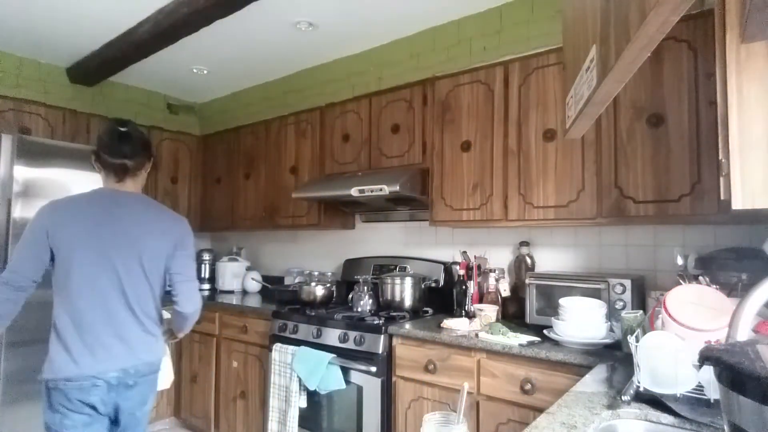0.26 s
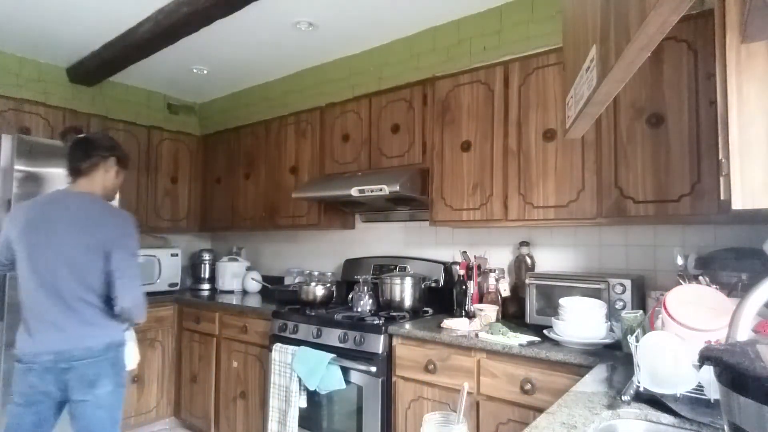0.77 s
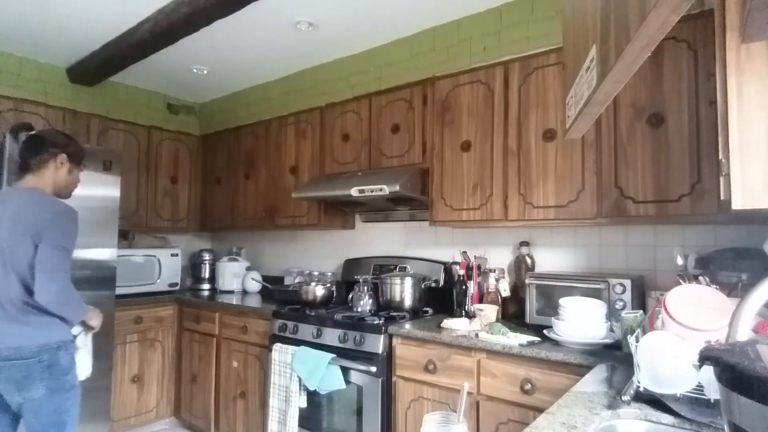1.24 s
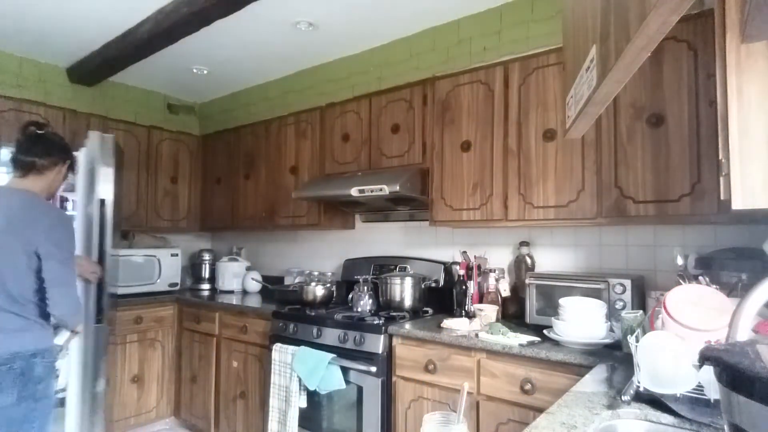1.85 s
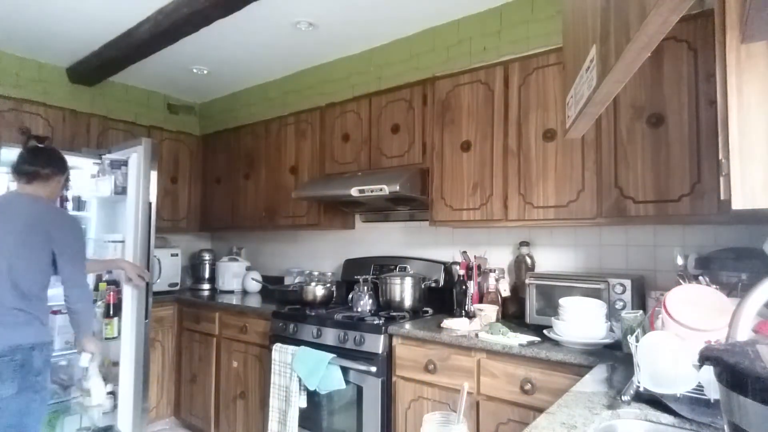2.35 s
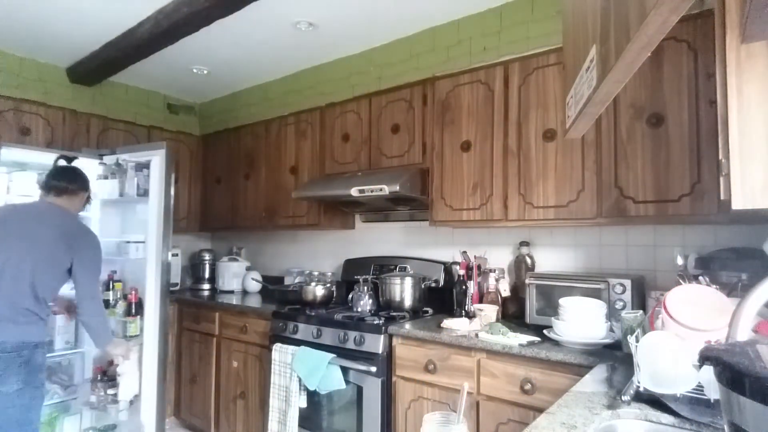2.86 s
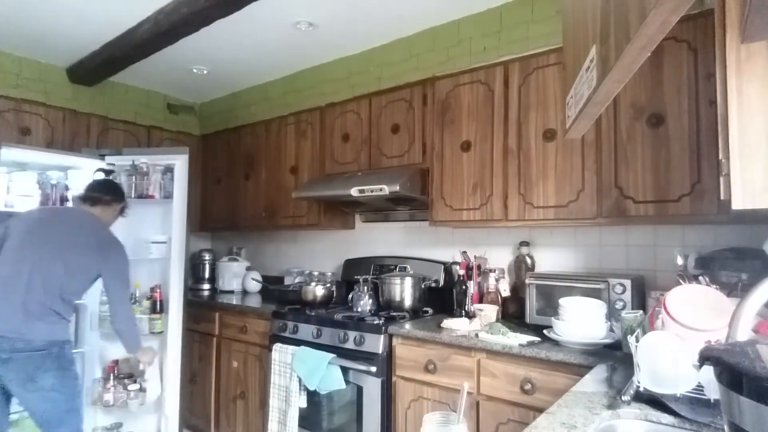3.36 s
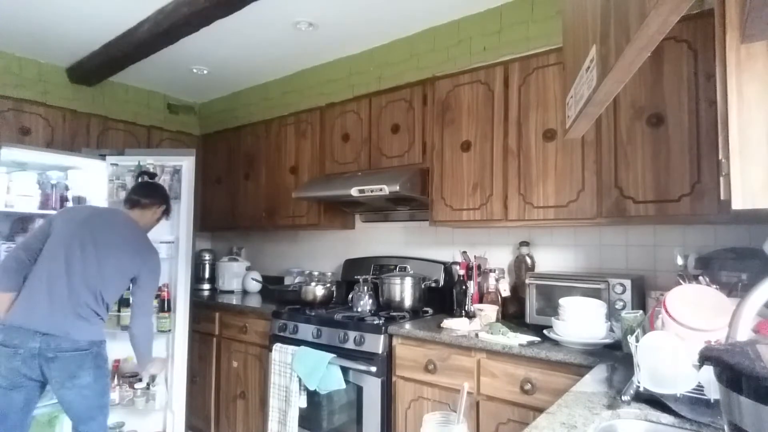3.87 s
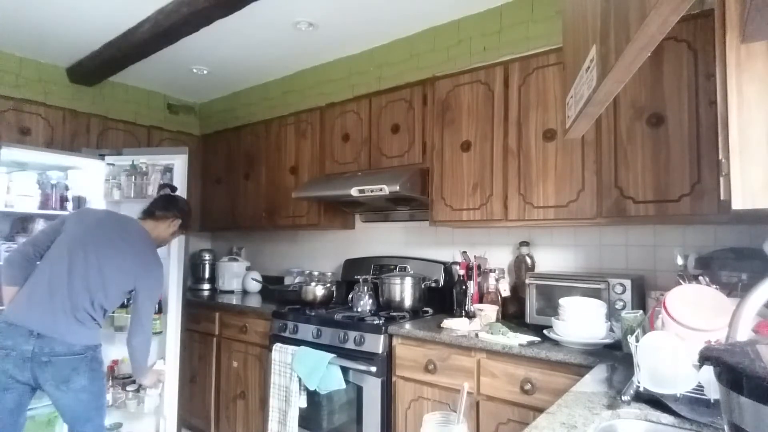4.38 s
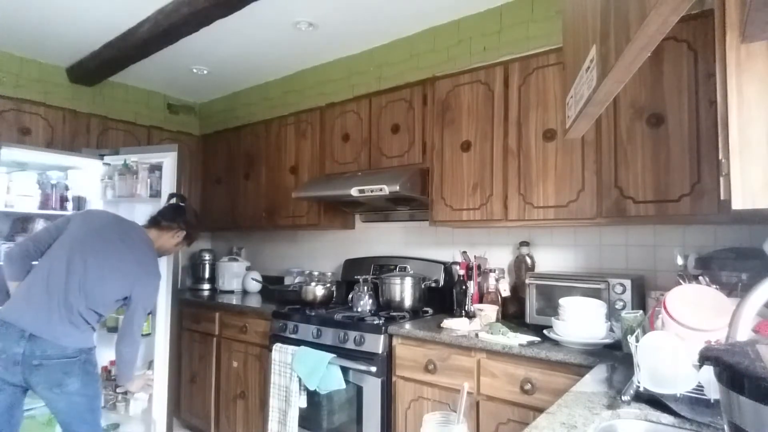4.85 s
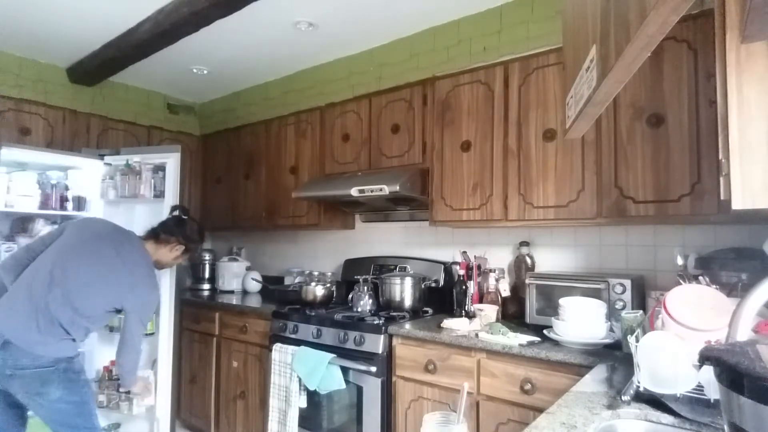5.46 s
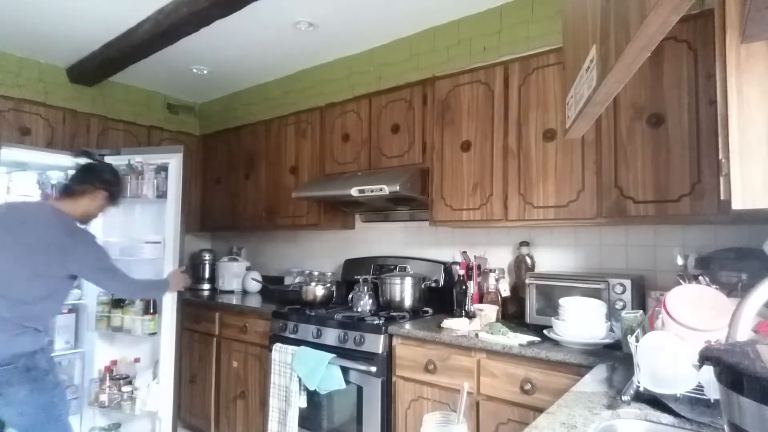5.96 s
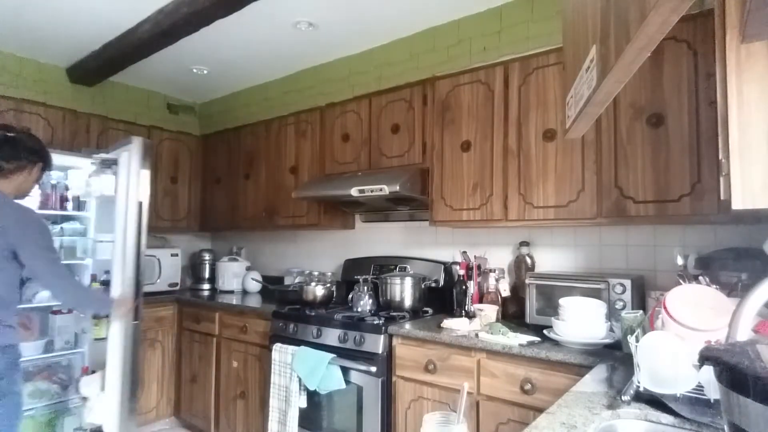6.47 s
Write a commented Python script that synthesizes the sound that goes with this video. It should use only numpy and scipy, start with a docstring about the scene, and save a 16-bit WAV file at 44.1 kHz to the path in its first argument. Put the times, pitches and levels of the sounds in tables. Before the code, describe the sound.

A far microphone in a quiet kitchen picks up soft footsteps and clothing, a swelling fridge hum and a quick run of dull door thuds. The hum stops; a hollow tub bumps, bottles clink and jars clatter sharply on plastic shelving. Sparse small knocks and rubs come next, then a second strong clatter, and lastly a low airy door swing with faintly rattling jars.

```python
"""A refrigerator across a home kitchen: its hum swells, the door is tugged open and the fan winds down.
Tugs and set-down jars knock the plastic door shelves: noise shaped by the door, panel modes, a note per container.
Bottles clink, a tub bumps, containers scrape and jostle; last, filtered noise follows the door swinging shut.
The microphone is far off, so knocks come mostly as room sound; clothes and still air are shaped noise."""
import sys
import numpy as np
from scipy import signal
from scipy.fft import rfft, irfft, next_fast_len
from scipy.io import wavfile
from scipy.ndimage import uniform_filter1d

SR = 44100
rng = np.random.default_rng(int(sys.argv[2]) if len(sys.argv) > 2 else 0)


def to_wav(sig):
    """Store sig (one row per channel, or 1-D mono) as 16-bit WAV at the path in sys.argv[1].

    Samples outside -1..1 are clipped; the rate is SR.
    """
    pcm = np.clip(np.atleast_2d(sig), -1, 1) * 32767
    pcm = np.round(pcm).astype(np.int16)
    wavfile.write(sys.argv[1], SR, pcm.T)  # frames by channels


N = 296087
TIME = np.arange(N) / SR
RING = np.arange(32768) / SR  # time axis of one event [s]


def amp(db):
    """Decibels to amplitude."""
    return 10 ** (np.asarray(db) / 20)


def evened(x):
    """Scales to rms 1."""
    return x / np.sqrt(np.mean(x ** 2) + 1e-20)


def read(points, hz):
    """Reads the first two columns of a table on a log-frequency axis."""
    f, value = np.transpose(points)
    return np.interp(np.log(hz + 1), np.log(np.abs(f) + 1), value)


def bins(x):
    """Frequencies of the spectrum of x [Hz]."""
    return np.fft.rfftfreq(len(x), 1 / SR)


def coloured(x, spectrum):
    """Gives x a spectrum and rms 1."""
    return evened(np.fft.irfft(rfft(x) * amp(read(spectrum, bins(x))), len(x)))


def burst():
    """White noise as long as one event."""
    return rng.standard_normal(len(RING))


def noise(spectrum):
    """Steady shaped noise for the whole scene."""
    return coloured(rng.standard_normal(next_fast_len(N)), spectrum)[:N]


def add(mix, start_s, sound):
    """Adds an event to the mix in place."""
    part = mix[max(round(start_s * SR), 0):][:len(sound)]
    part += sound[:len(part)]


def swell(rise_s):
    """Reflections pile up over the first milliseconds."""
    return 1 - np.exp(-RING / rise_s)


def held(on_s, off_s, rise_s, fall_db_per_s):
    """Gain that rises from on_s and fades from off_s."""
    rising = 1 - np.exp(-np.maximum(TIME - on_s, 0) / rise_s)
    return rising * amp(-fall_db_per_s * np.maximum(TIME - off_s, 0))


# kitchen reverberation: (frequency [Hz], t60 [s])
ROOM = [(60, 1), (150, 0.3), (400, 0.48), (1500, 0.47), (4000, 0.41), (8000, 0.4), (15000, 0.65)]


def dying(x):
    """Each band of a burst dies away at the pace of the kitchen."""
    hz, t, z = signal.stft(x, SR, nperseg=512)
    decay = amp(-60 * t / read(ROOM, hz)[:, None])
    return signal.istft(z * decay, SR, nperseg=512)[1][:len(x)]


def stroke(length_s, rise_s, sag_db_per_s=10):
    """Swells, eases off while the rubbing lasts, then dies in the room."""
    sag_db = sag_db_per_s * (length_s / 2 - np.minimum(RING, length_s))
    room_db = -60 * np.maximum(RING - length_s, 0) / read(ROOM, 1500)
    return swell(rise_s) * amp(sag_db + room_db)


def ring(modes, blur, shade=None):
    """Decaying modes; echoes blur each one with a slowly wandering part."""
    out, knots = np.zeros(len(RING)), RING[::700]
    for hz, db, t60_s in modes:
        phase = rng.random()
        wander = rng.standard_normal(len(knots))
        shade_db = read(shade, hz) if shade else 0
        size = amp(db + shade_db - 60 * knots / t60_s) * (1 + blur * wander)
        wave = np.sin((2 * np.pi * (hz * RING + phase)).astype(np.float32))
        out += np.interp(RING, knots, size) * wave
    return out * np.sqrt(2)


# blows on door and shelves: (time [s], level [dB], thump [dB], contact hardness [dB],
#   note of the jar, lid or panel hit [Hz], note against blow [dB])
KNOCKS = [(1.069, -62.5, 19.5, -15.5, 315, 1), (1.143, -48, 10, -12, 288, -12.5),
          (1.168, -44.5, 8.5, -7, 73.2, 3.5), (1.211, -39.5, 12.5, -0.5, 309.3, 6),
          (1.234, -34.5, 1, -6, 380, -6.5), (1.3, -37, 5.5, -11.5, 49.4, -8),
          (1.345, -46.5, 8, -7, 267, -13), (1.445, -52, -5, 1, 312, -1), (1.797, -68, 15.5, -2, 1580, -8),
          (2.375, -49.5, 2, -1.5, 279, -1), (2.394, -51, 12.5, 11, 240.3, 3),
          (2.631, -43.5, -5, 5.5, 550, -12), (2.675, -43, -1, 10.5, 1690, -7),
          (2.715, -47.5, 4, 11, 291, -1.5), (2.78, -45.5, 3.5, 10, 222, -4),
          (2.826, -48, -16, 8, 1660, -16), (3.408, -30.5, -14, 2.5, 587.4, -5),
          (3.438, -33.5, 2.5, 2, 947, -6.5), (3.49, -45.5, 14, -15, 578, 1.5),
          (3.547, -41, 4, 11.5, 462, 0), (3.593, -41.5, -10, 9, 2450, -9), (3.616, -24, -3.5, 8.5, 575, -3),
          (3.631, -19.5, -6, -2.5, 357, -10.5), (3.642, -30.5, -6, -3, 446.5, 1),
          (3.781, -39, 1.5, 11.5, 556, -0.5), (4.132, -63, -4, -1, 1785, 1), (4.441, -48, 1, 4, 650, -15),
          (4.481, -39.5, 1, -2, 718, -10), (4.508, -42.5, 6.5, -1, 124, -1),
          (4.645, -44.5, 3.5, 1, 261, -11), (4.708, -46, 11.5, 1, 273.6, 1.5),
          (5.456, -50.5, 5, -4, 240, -10), (5.483, -41, 3.5, -2, 563, -5.5),
          (5.51, -40.5, 2.5, -4.5, 353.6, -5.5), (5.638, -40, -5, 5, 2410, -9),
          (5.688, -29, 1.5, 4.5, 277.4, -4), (5.696, -24, -4, 0.5, 350.7, -5.5),
          (6.002, -55.5, 9, 8, 329, 7), (6.276, -58, 4, 1, 205, 2)]
# hollow tub bumping along a shelf: (time [s], level [dB])
BUMPS = [(2.785, -43), (2.921, -37), (2.99, -36.5), (3.208, -40), (3.263, -38.5)]
BUMP_DB, BUMP_THUMP_DB, BUMP_HARD_DB = -5, 2.5, -4  # shelf knock per bump; BUMP_DB is against the bump
RISE_S, RISE_DB_PER_HARD_DB = 0.0039, -0.5  # build-up at hardness 0; harder is faster
ROCK_DELAY_S, ROCK_DB, ROCK_RISE_S = 0.088, -19.5, 0.022  # ROCK_DB is against the blow


def blows():
    """Rows (s, dB, thump dB, hardness dB, rise s): knocks, tub bumps, one rock back before each pause."""
    first = [row[:4] for row in KNOCKS]
    first += [(s, db + BUMP_DB, BUMP_THUMP_DB, BUMP_HARD_DB) for s, db in BUMPS]
    pauses = np.diff([row[0] for row in KNOCKS], append=TIME[-1])
    rocking = [(s + ROCK_DELAY_S, db + ROCK_DB, thump, hard, ROCK_RISE_S)
               for (s, db, thump, hard), pause in zip(first, pauses) if pause > ROCK_DELAY_S]
    struck_once = [(s, db, thump, hard, RISE_S * amp(RISE_DB_PER_HARD_DB * hard))
                   for s, db, thump, hard in first]
    return struck_once + rocking


# loaded door when struck: (frequency [Hz], density [dB per Hz])
DOOR = [(18, -34), (35, -9), (80, -7.5), (240, 0.5), (350, -0.5), (570, -1.5), (720, -2.5), (1000, -6.5),
        (2300, -15.5), (2850, -22), (4500, -29), (6700, -40.5), (8200, -54.5), (15000, -59)]
# ringing panels and bins: (frequency [Hz], level [dB], t60 [s])
DOOR_MODES = [(79.43, -16.5, 0.75), (114, -14, 0.45), (159, -17, 0.6), (225.4, -14.5, 0.41),
              (280.1, -13.5, 0.51), (357, -20, 0.14), (476, -28.5, 0.22), (497, -17, .4),
              (577, -13.5, 0.36), (632, -13.5, 0.41), (763, -21.5, 0.62), (823, -18, 0.13),
              (849, -30, 0.26), (979, -14, 0.13), (1104, -25.5, 0.67), (1364, -15.5, 0.27),
              (1652, -21, 0.45), (2130, -30.5, 0.21), (2493, -25.5, 0.28)]
# clatter and tick: (frequency [Hz], level at hardness 0 [dB], slope [dB per dB of hardness])
HARD_SHADE = [(615, -0.5, 0), (2000, 1, 0.78), (5000, 1, 1.18), (8000, -2.5, 1.21), (12000, -1, 0)]
THUMP_HZ = 218


def knocks(dense_db=-2.5, modes_db=-3.0, early_db=2, early_s=0.0015, grain=0.1, blur=0.21):
    """Every blow rings the door: a thicket of shelf resonances and echoes, a few panel modes standing out."""
    out, hz = np.zeros(N), bins(RING)
    body = evened(amp(read(DOOR, hz)))
    for s, db, thump_db, hard_db, rise_s in blows():
        shade = [(THUMP_HZ, thump_db)]
        shade += [(f, level + slope * hard_db) for f, level, slope in HARD_SHADE]
        # first reflections arrive as uneven clicks, later ones merge smoothly
        steps = np.repeat(rng.standard_normal(512), len(RING) // 512)
        uneven = np.exp(grain * np.exp(-RING / 0.016) * steps)
        dense = dying(irfft(rfft(burst() * uneven) * body * amp(read(shade, hz))))
        blow = amp(dense_db) * dense + amp(modes_db) * ring(DOOR_MODES, blur, shade)
        add(out, s, amp(db + early_db * np.exp(-RING / early_s)) * swell(rise_s) * blow)
    return out


NOTE_T60_S, NOTE_REF_HZ, NOTE_DAMPING = 0.27, 400, 0.28  # t60 at NOTE_REF_HZ; power by which it falls with pitch
OVERTONE_RATIO, OVERTONE_DB = 1.8, -13  # against the note


def containers(rise_s=0.003, blur=0.1):
    """Each knock adds a note of its own and one overtone; higher partials die sooner."""
    out = np.zeros(N)
    for s, db, _, _, hz, note_db in KNOCKS:
        level_db = db + note_db
        partials = [(hz, level_db), (hz * OVERTONE_RATIO, level_db + OVERTONE_DB)]
        modes = [(f, level, NOTE_T60_S * (NOTE_REF_HZ / f) ** NOTE_DAMPING) for f, level in partials]
        add(out, s, swell(rise_s) * ring(modes, blur))
    return out


def struck(hits, modes, rise_s, blur):
    """One object ringing with the same modes at each hit."""
    out = np.zeros(N)
    for s, db in hits:
        add(out, s, amp(db) * swell(rise_s) * ring(modes, blur))
    return out


# glass bottles touching: (time [s], level [dB])
CLINKS = [(3.41, -42.5), (3.449, -32), (3.516, -40)]
# glass modes: (frequency [Hz], level [dB], t60 [s])
GLASS = [(3140, -3, 0.16), (3040, -25, 0.27), (2960, -7, 0.31), (3500, -18.5, 0.23), (3550, -14, 0.16),
         (3410, -16, 0.24), (6260, -33, 0.51), (1633, -8.5, 0.1), (1324, -9, 0.19)]


def clinks():
    """Touching bottles ring in high glass modes."""
    return struck(CLINKS, GLASS, rise_s=0.006, blur=0.22)


# tub modes: (frequency [Hz], level [dB], t60 [s])
TUB = [(483.4, 3, 0.15), (522, -3.5, 0.2), (375, -3.5, 0.11), (789, -7, 0.21), (1040, -23, 0.21)]


def tub():
    """A hollow tub rings in short low modes at each bump."""
    return struck(BUMPS, TUB, rise_s=0.019, blur=0.37)


# snaps of hard plastic: (time [s], level [dB])
SNAPS = [(3.409, -57), (3.55, -52), (3.617, -54), (3.78, -65), (5.485, -63), (5.531, -65), (5.643, -64.5),
         (5.696, -61.5), (6.002, -81.5)]
# snap spectrum: (frequency [Hz], density [dB per Hz])
SNAP = [(2500, -25), (4300, 5), (7000, 0.5), (8500, -9), (10500, -3), (12500, -1.5), (16000, -9)]


def snaps(early_db=2.5, early_s=0.012, rise_s=0.0005):
    """Plastic edges click: a sharp front and a bright room tail."""
    out = np.zeros(N)
    for s, db in SNAPS:
        tail = dying(coloured(burst(), SNAP))
        add(out, s, amp(db + early_db * np.exp(-RING / early_s)) * swell(rise_s) * tail)
    return out


# seal peeling off, containers dragged along plastic: (start [s], length [s], level [dB])
SCRAPES = [(1.34, 0.17, -63), (2.435, 0.068, -53), (2.657, 0.31, -52.5), (3.07, 0.3, -58.5),
           (3.418, 0.34, -42), (4.015, 0.18, -76), (4.469, 0.33, -53.5), (5.307, 0.19, -73.5),
           (5.488, 0.32, -54), (6.103, 0.024, -57.5)]
# rubbing spectrum: (frequency [Hz], density [dB per Hz])
RUB = [(100, -8), (500, 2), (1200, -3.5), (2300, -9), (3000, -12), (6500, -23), (8200, -42.5),
       (15000, -27.5)]
# squeak of the peeling rubber seal: (start [s], length [s], centre [Hz], width [Hz], level [dB])
SQUEAK = (1.228, .04, 5170, 200, -71.5)


def friction(slips_per_s=45, slip_db=2, slip_decay_s=0.03, modes_db=-4):
    """Containers stick and slip on the shelves and stir the door's panels; the seal squeaks once, thinly."""
    out, hz = np.zeros(N), bins(RING)
    panels = 1 + amp(modes_db) * sum(4 / (1 + ((hz - mode[0]) / 9) ** 2) for mode in DOOR_MODES)
    r = np.exp(-1 / (slip_decay_s * SR))
    for s, length_s, db in SCRAPES:
        slips = signal.lfilter([1], [1, -r], rng.random(len(RING)) < slips_per_s / SR)
        rubbing = irfft(rfft((1 + amp(slip_db) * slips) * burst()) * panels)
        add(out, s, amp(db) * stroke(length_s, rise_s=0.0038) * coloured(rubbing, RUB))
    s, length_s, centre_hz, width_hz, db = SQUEAK
    resonance = 1 / (1 + (2 * (hz - centre_hz) / width_hz) ** 2)
    squeak = evened(irfft(rfft(burst()) * resonance))
    add(out, s, amp(db) * stroke(length_s, rise_s=0.0032) * squeak)
    return out


# neighbouring containers jostled by the hand: (start [s], length [s], level [dB])
JOSTLES = [(1.8, 0.11, -84), (2.64, 0.17, -53.5), (3.238, 0.074, -56), (3.93, .24, -60),
           (4.229, 0.2, -67.5), (4.819, .25, -70.5)]
# jostle spectrum: (frequency [Hz], density [dB per Hz])
JOSTLE = [(300, -14.5), (750, -7.5), (1150, 1.5), (1500, -2.5), (2150, -1.5), (2800, -13), (5000, -22),
          (8000, -45.5), (15000, -52)]


def jostles(count=3, rise_s=0.0019):
    """Light touches, one at a chance moment in each equal part of a jostle."""
    out = np.zeros(N)
    for start_s, length_s, db in JOSTLES:
        for k, when in enumerate(rng.random(count)):
            touch = swell(rise_s) * dying(coloured(burst(), JOSTLE))
            add(out, start_s + length_s * (k + when) / count, amp(db) * touch)
    return out


# pulls that swing the door shut: (start [s], length [s], effort [dB])
PULLS = [(6.265, 0.1, -5.5), (6.587, .15, 1.5)]
# spectra of pushed air, hinge shudder, rattling contents: (frequency [Hz], density [dB per Hz])
PUSH = [(15, -3), (38, -20), (60, -6), (110, -20), (300, -75)]
SHUDDER = [(70, -34), (150, 0.5), (220, 5.5), (320, -4.5), (600, -8), (1200, -24.5), (3000, -78)]
RATTLE = [(400, -23), (800, 0), (1300, 0.5), (2100, 4.5), (3300, -10), (4700, -7.5), (5700, -20),
          (6800, -23), (8500, -47), (15000, -34)]
PULL_RISE_S, COAST_DB_PER_S = 0.032, 43  # picks up speed, then coasts


def swing(push_db=-41, shudder_db=-45, rattle_db=-52,  # levels at speed 1
          push_power=1.05, shudder_power=0.73, rattle_power=1.25, grain=0.13):
    """The moving door pushes air, shudders on its hinge and rattles its contents, each by a power of speed."""
    pulls = [amp(db) * held(s, s + length_s, PULL_RISE_S, COAST_DB_PER_S) for s, length_s, db in PULLS]
    speed = np.max(pulls, axis=0)
    knots = TIME[::150]
    jolts = np.exp(grain * np.interp(TIME, knots, rng.standard_normal(len(knots))))
    push = amp(push_db) * speed ** push_power * noise(PUSH)
    shudder = amp(shudder_db) * speed ** shudder_power * noise(SHUDDER)
    rattle = amp(rattle_db) * speed ** rattle_power * evened(noise(RATTLE) * jolts)
    return push + shudder + rattle


def tone(hz, gain, waver=0.044):
    """A sine whose level wavers slowly."""
    knots = TIME[::5000]
    drift = np.interp(TIME, knots, rng.standard_normal(len(knots)))
    cycles = np.cumsum(hz * np.ones(N)) / SR + rng.random()
    return np.sqrt(2) * gain * (1 + waver * drift) * np.sin(2 * np.pi * cycles)


HUM_HZ, HUM_DB, HUM_IDLE_DB = 151.7, -60.5, -84  # HUM_DB adds to idle
HUM_ON_S, HUM_OFF_S, HUM_RISE_S, HUM_STOP_DB_PER_S = 0.6, 2.3, 0.49, 140


def hum():
    """The refrigerator's hum swells once switched on and stops quickly, over a faint idle tone."""
    running = amp(HUM_DB) * held(HUM_ON_S, HUM_OFF_S, HUM_RISE_S, HUM_STOP_DB_PER_S)
    return tone(HUM_HZ, amp(HUM_IDLE_DB) + running)


OPEN_S, OPENING_S, FAN_STOP_S = 1.45, 0.4, 3.2
FAN_HZ, FAN_SAG_HZ_PER_S, FAN_STOP_DB_PER_S = 290, 88, 126
FAN_SHUT_DB, FAN_OPEN_DB = -82.5, -71.5


def fan():
    """Muffled until the door opens, then cut off: its pitch runs down and it fades out."""
    since_open_s = np.maximum(TIME - OPEN_S, 0)
    fan_hz = np.maximum(FAN_HZ - FAN_SAG_HZ_PER_S * since_open_s, 0)
    door_db = np.interp(since_open_s, [0, OPENING_S], [FAN_SHUT_DB, FAN_OPEN_DB])
    stop_db = -FAN_STOP_DB_PER_S * np.maximum(TIME - FAN_STOP_S, 0)
    return tone(fan_hz, amp(door_db + stop_db))


# steady motor tones: (frequency [Hz], level [dB])
DRONE = [(41.5, -70), (79, -75.5), (119, -79)]


def drone():
    """Low motor tones sound throughout."""
    return sum(tone(hz, amp(db)) for hz, db in DRONE)


# movements of feet and clothes: (peak time [s], level [dB], half width [s])
MOVES = [(.04, -62, 0.11), (1.6, -61.5, 0.25), (2.4, -64, 0.31), (3.85, -64.5, 0.49), (4.9, -65.5, 0.41),
         (6.1, -69, 0.34), (6.7, -61, 0.44)]
# rustle spectrum: (frequency [Hz], density [dB per Hz])
CLOTH = [(40, -7.5), (120, 7.5), (300, 1.5), (700, -8.5), (1500, -18), (3000, -32), (6000, -46),
         (15000, -61)]
STIR_DB = -80  # between movements


def shuffle():
    """Feet and clothes rustle softly, a swell and a fade per movement."""
    motion = sum(amp(db) / np.cosh(1.57 * (TIME - s) / width_s) for s, db, width_s in MOVES)
    return np.hypot(amp(STIR_DB), motion) * noise(CLOTH)


# still kitchen air: (frequency [Hz], density [dB per Hz])
AIR = [(12, -10.5), (22, -3), (32, -11), (59, -9), (129, -24), (200, -25), (320, -25), (746, -39),
       (1160, -53.5), (2680, -57.5), (7730, -60.5), (15500, -56)]
AIR_DB = -66.5


def air():
    """Steady low-heavy noise of the still kitchen."""
    return amp(AIR_DB) * noise(AIR)


# stereo balance: (frequency [Hz], left minus right [dB])
BALANCE_DB = [(400, 0), (1290, .5), (2380, 1.6), (3300, 4), (4600, 9), (6500, 8), (8500, -.5), (15000, -.3)]


def scene():
    """All sources lie in one direction; the right channel is duller in the presence range."""
    items = knocks() + containers() + clinks() + tub() + snaps() + friction() + jostles()
    mono = items + swing() + hum() + fan() + drone() + shuffle() + air()
    padded = np.pad(mono, (0, next_fast_len(N + 4096) - N))
    ratio = amp(read(BALANCE_DB, bins(padded)))
    gains = np.array([2 * ratio, 2 + 0 * ratio]) / (1 + ratio)
    return np.fft.irfft(rfft(padded) * gains, len(padded))[:, :N]


# microphone hiss: (frequency [Hz], density [dB per Hz])
HISS = [(3000, -9), (6000, 0.5), (8500, -30), (12500, 0), (16000, 4.5)]
EDGE_HZ = 15800


def record(dry, hiss_db=-82, open_db=-54, depth_db=17, slope=0.49, hold_s=0.09):
    """A noise suppressor ducks the microphone hiss when the sound is quiet; then the band limit."""
    band = signal.butter(2, [500, 6000], "band", fs=SR, output="sos")
    mids = signal.sosfilt(band, dry.mean(0))
    level_db = 10 * np.log10(np.abs(uniform_filter1d(mids ** 2, size=600)) + 1e-12)
    shut_db = np.clip(slope * (level_db - open_db), -depth_db, 0)
    r = np.exp(-1 / (hold_s * SR))
    gate = signal.lfilter([1 - r], [1, -r], amp(shut_db))
    wet = dry + amp(hiss_db) * gate * noise(HISS)
    lowpass = signal.firwin(511, EDGE_HZ, window=("kaiser", 9), fs=SR)
    return signal.oaconvolve(wet, lowpass[None], "same")


dry = scene()
out = record(dry)
to_wav(out)
```